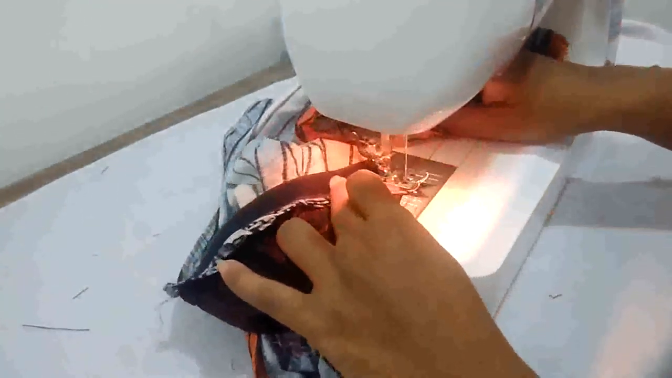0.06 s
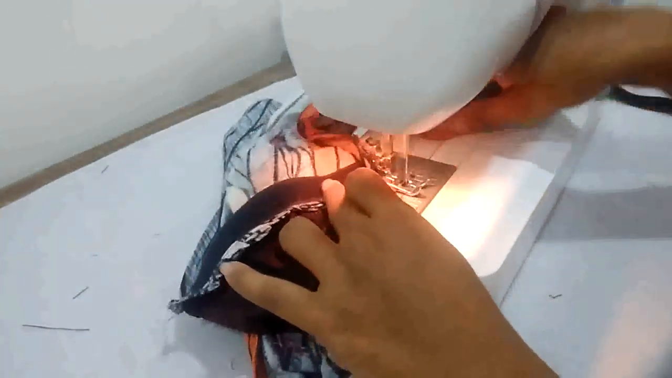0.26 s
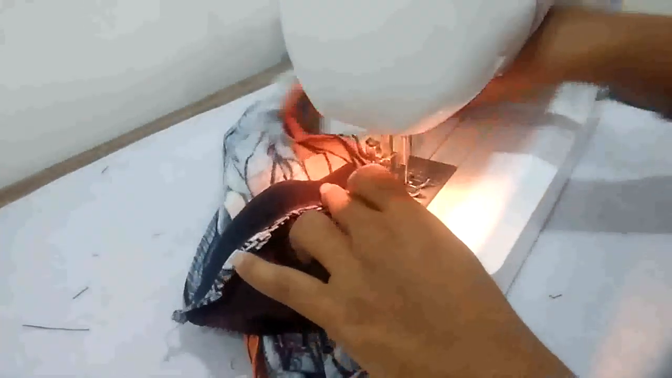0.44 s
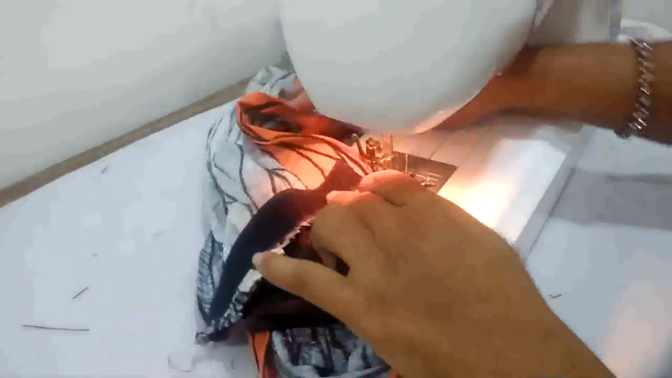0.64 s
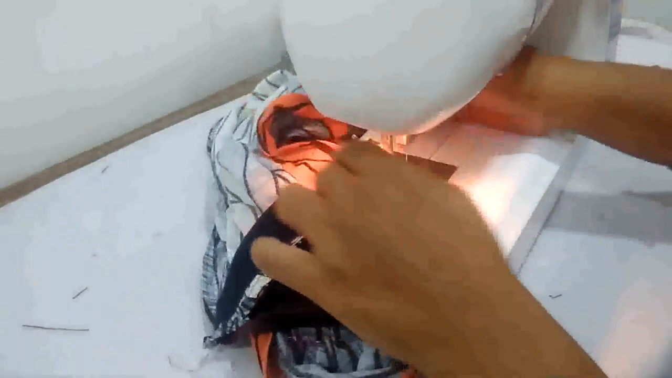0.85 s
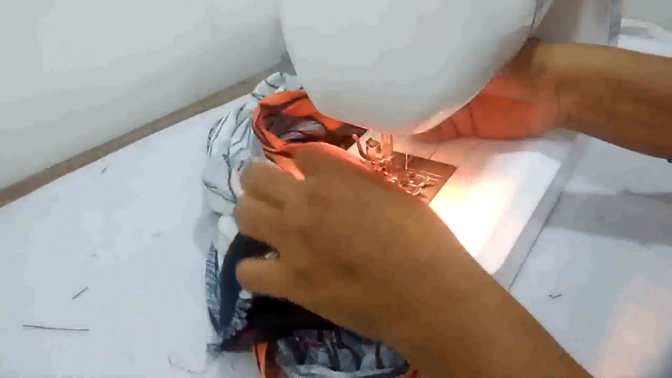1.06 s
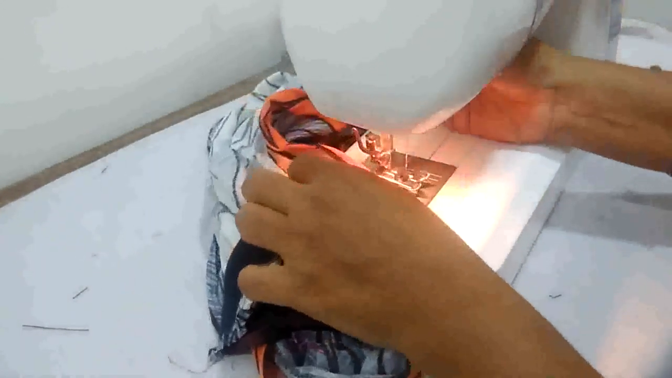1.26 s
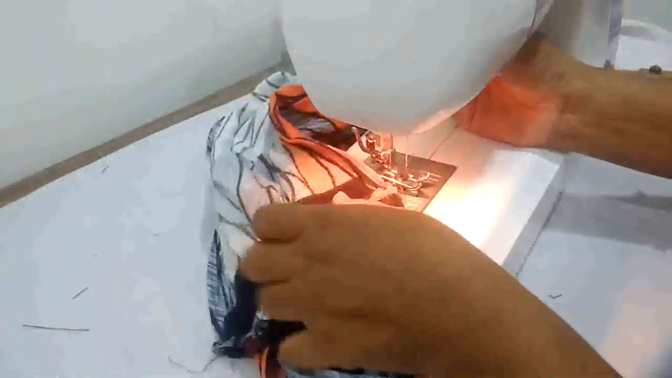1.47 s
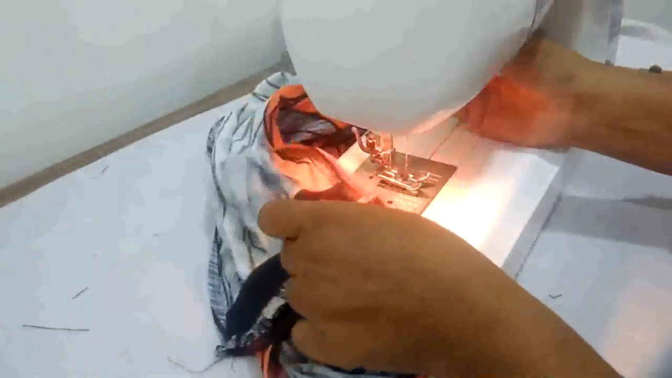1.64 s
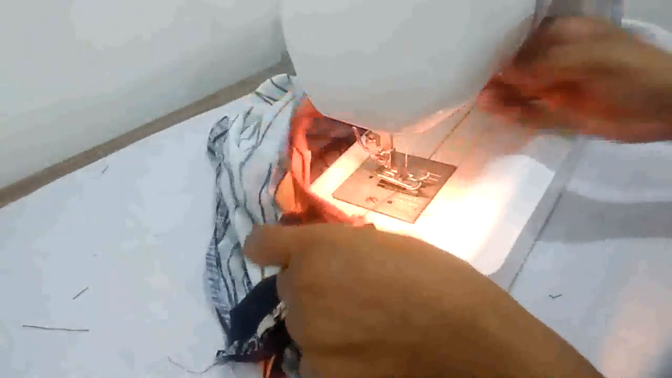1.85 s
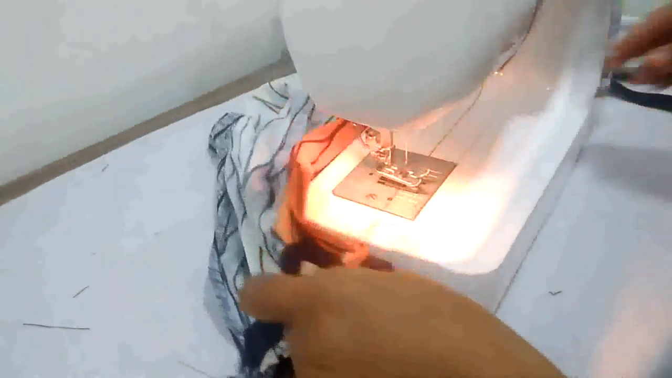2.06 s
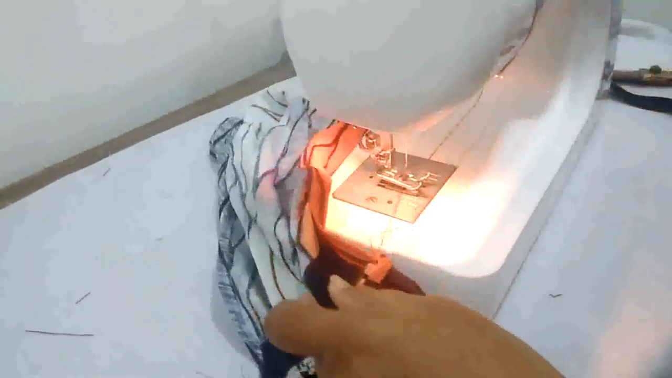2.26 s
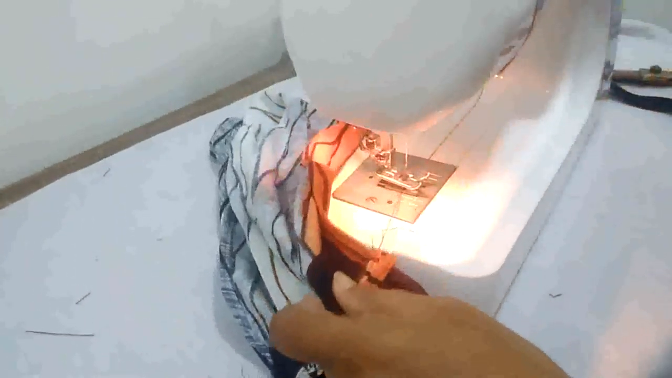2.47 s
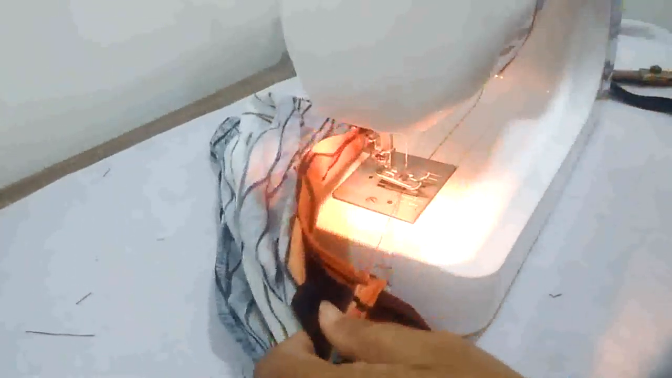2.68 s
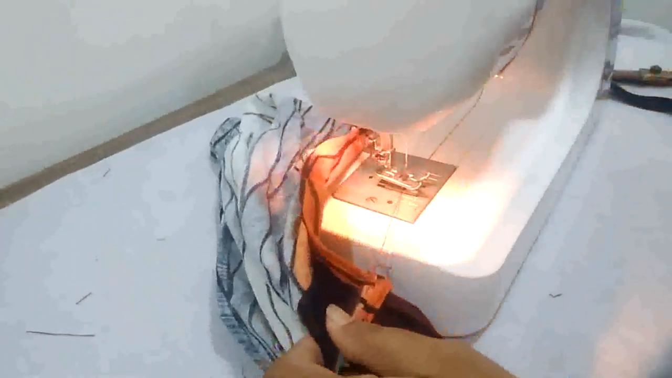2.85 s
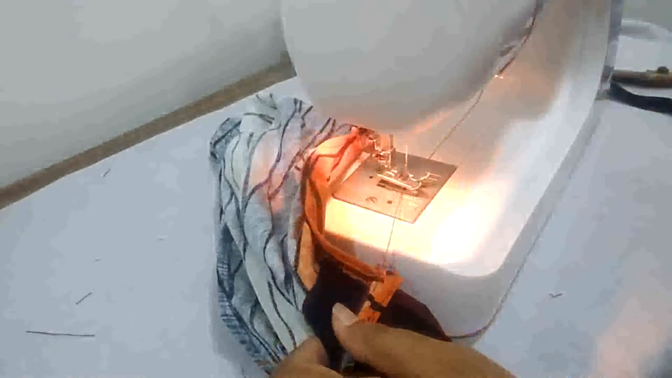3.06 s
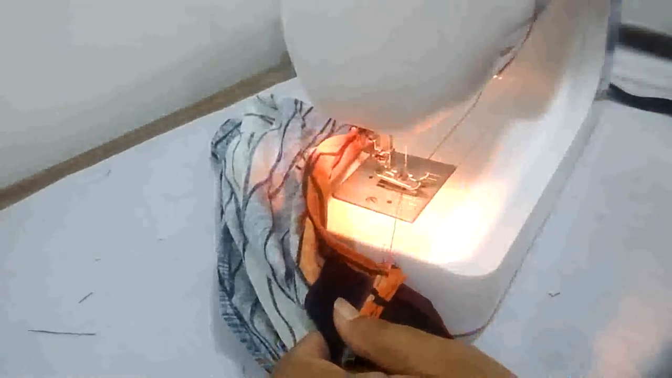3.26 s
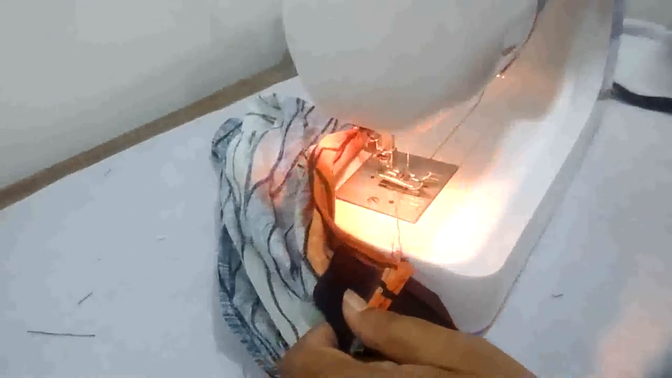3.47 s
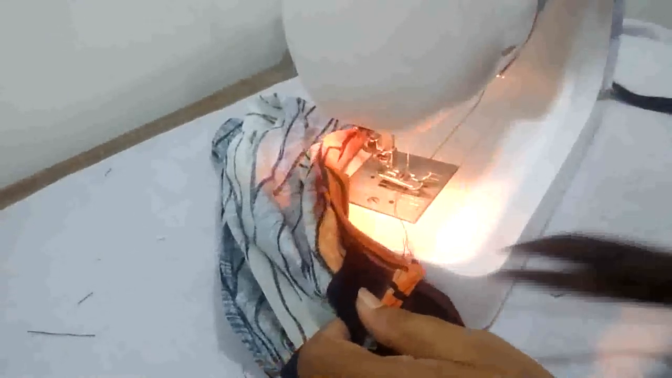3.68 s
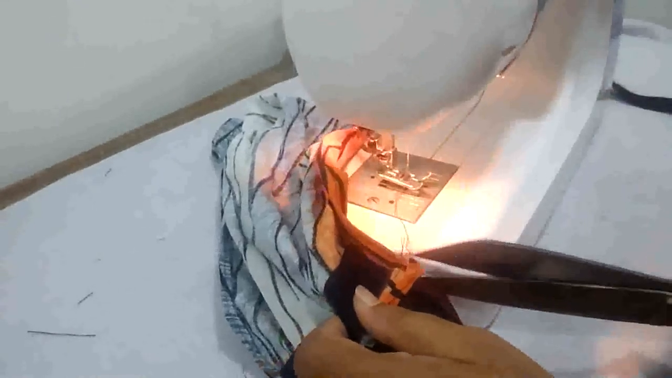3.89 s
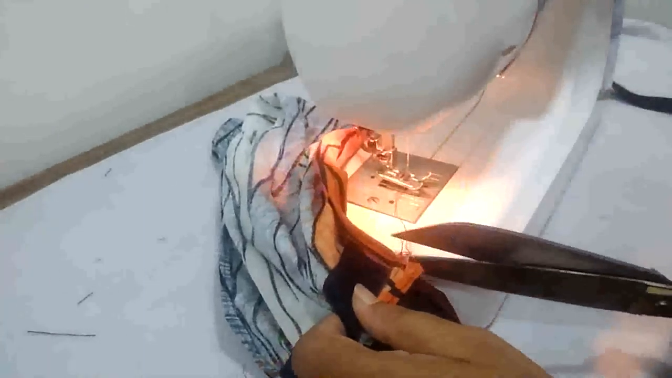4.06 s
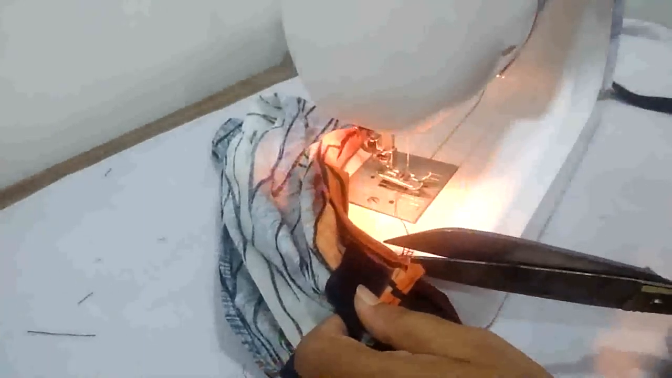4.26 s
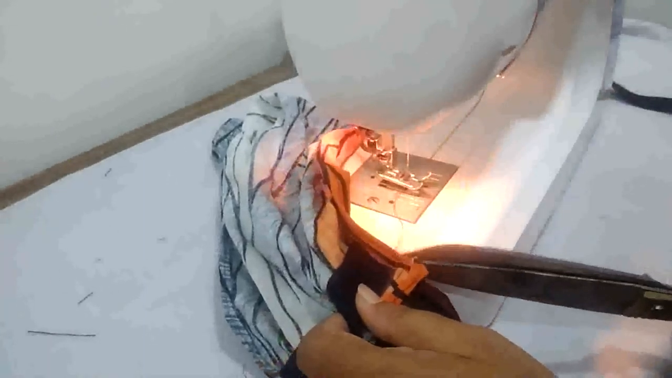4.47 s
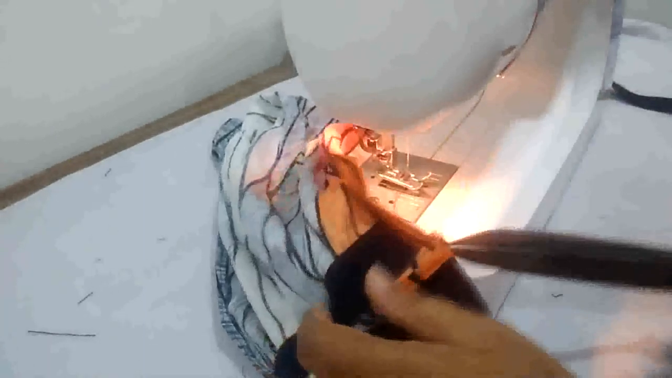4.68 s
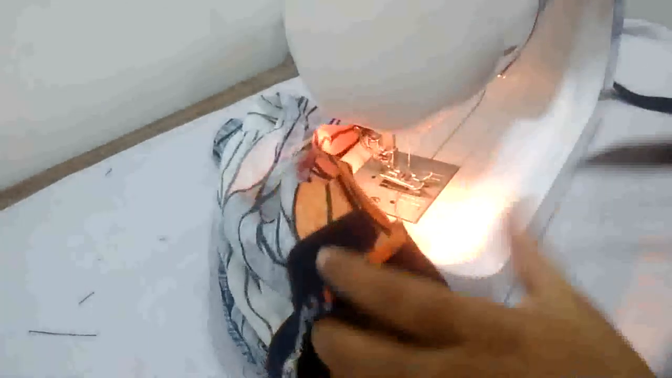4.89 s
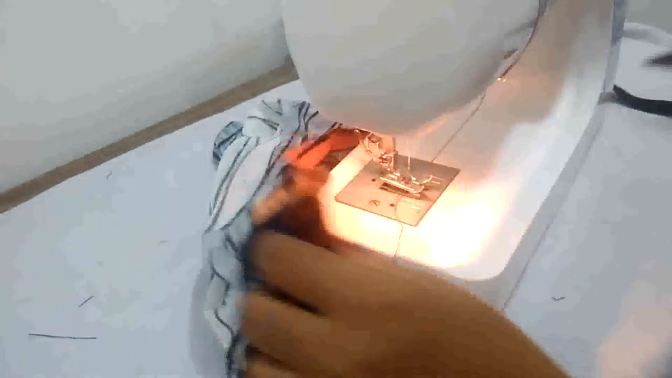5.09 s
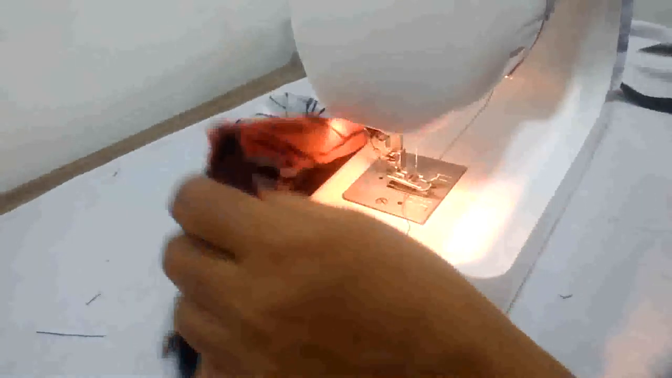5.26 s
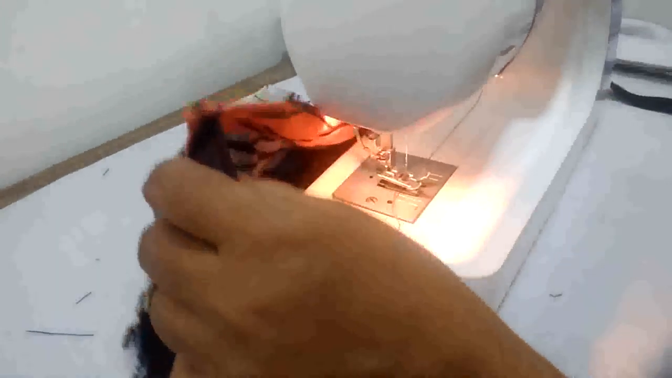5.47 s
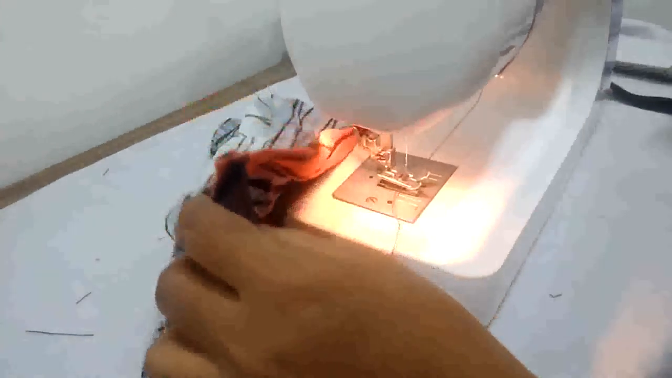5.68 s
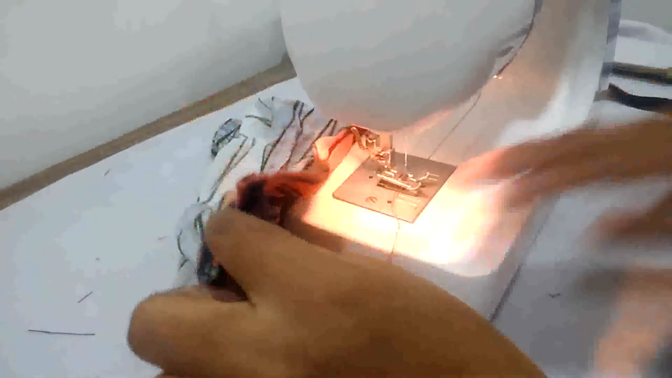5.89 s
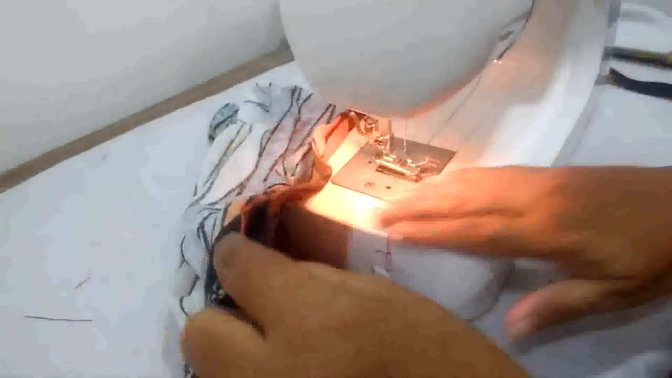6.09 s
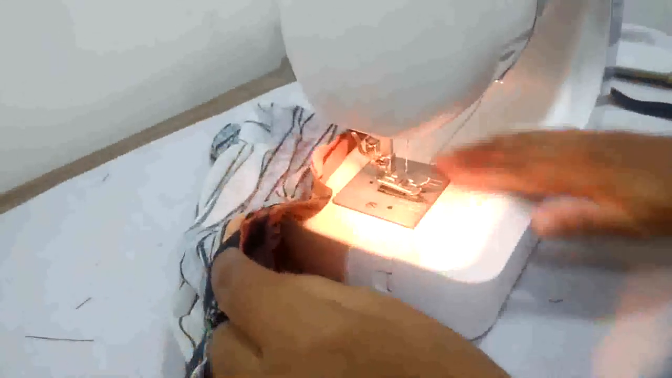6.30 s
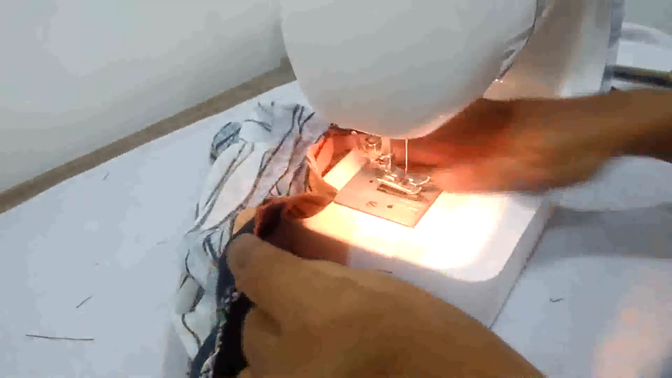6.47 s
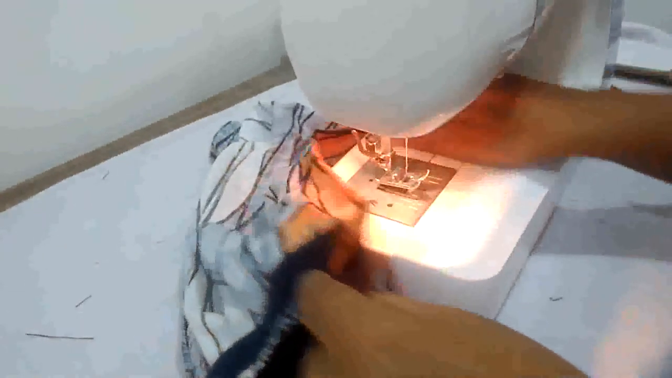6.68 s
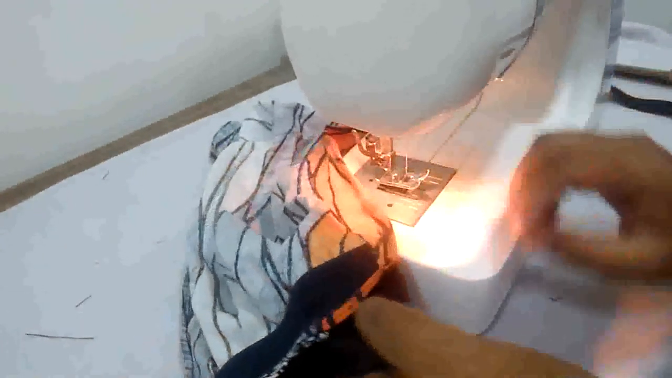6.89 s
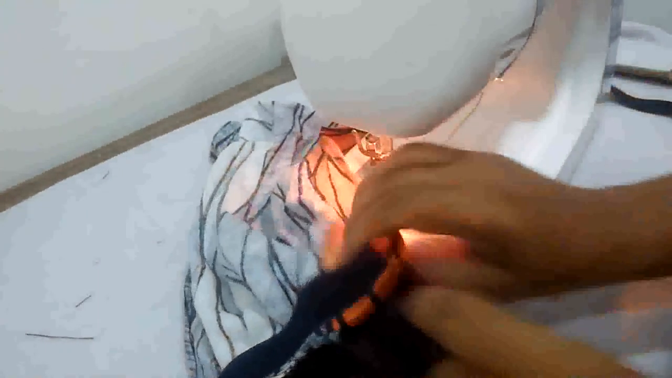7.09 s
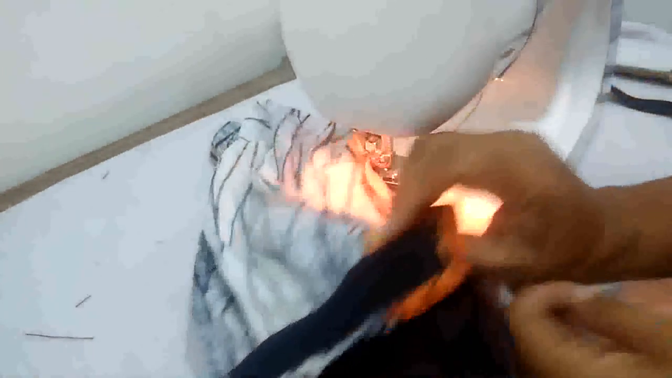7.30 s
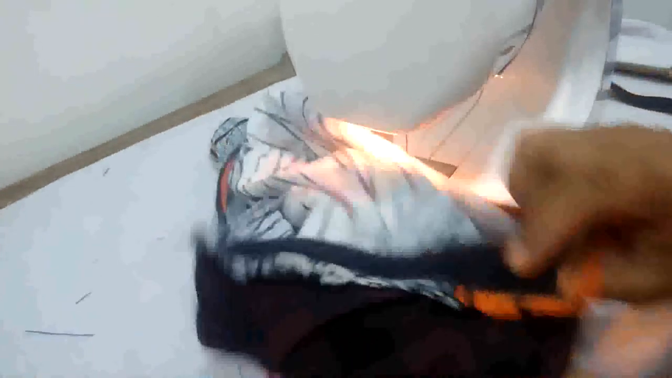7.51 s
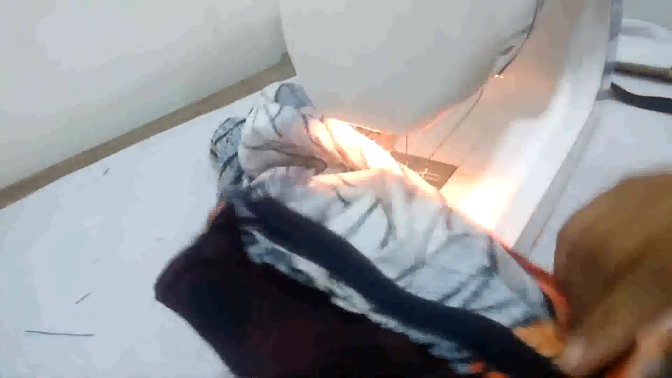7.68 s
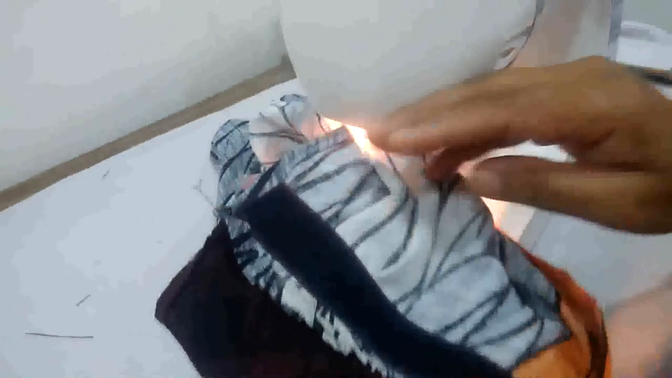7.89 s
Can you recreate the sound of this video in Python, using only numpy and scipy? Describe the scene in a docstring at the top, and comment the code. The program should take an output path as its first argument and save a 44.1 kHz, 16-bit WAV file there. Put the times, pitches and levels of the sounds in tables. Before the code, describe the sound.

A sewing machine's rapid metallic chugging with low table hum runs down and ceases. In the quiet room, close to the microphone, a lever clacks, cloth slides and hands bump the table faintly. Steel shears clink brightly, their blades squeak open and snap shut once. They are dropped on the table with a hard thud, bouncing clang and short ring. Fabric rustles, small clacks and a bright click end it over faint outside rumble.

```python
"""In a small room, heard from close by, an electric sewing machine on a table ends a seam and coasts to a stop.
The presser foot is lifted, the cloth drawn out, and steel shears are picked up, opened and snapped shut.
The shears are put down with a thump and a ring, then the cloth is turned over.
Contacts are short noise bursts coloured by what is struck, ringing is a sum of dying modes,
and gears, friction and room noise are filtered random noise."""
import sys
import numpy as np
from scipy import signal
from scipy.io import wavfile

SR = 44100
rng = np.random.default_rng(int(sys.argv[2]) if len(sys.argv) > 2 else 0)


def file_out(sig):
    """Save sig as 16-bit WAV at sys.argv[1]."""
    # one column per channel
    cols = np.atleast_2d(sig).T
    # limit, then scale
    lim = np.clip(cols, -1, 1)
    pcm = np.round(lim * 32767).astype(np.int16)
    wavfile.write(sys.argv[1], SR, pcm)


N = 350300
TIME = np.arange(N) / SR  # s, the whole scene
RING = np.arange(SR * 3 // 4) / SR  # s, the span of one contact
BINS = np.fft.rfftfreq(8192, 1 / SR)  # Hz, where filter gains are given

# Needle bar, hook and feed knock at the same places in every turn. Each row: share of the turn,
# relative level in dB, tilt in dB per octave, share of the stitch's force that it follows.
KNOCK_PLACES = [(0.16, -41, -3, 1.5), (0.385, -31.5, 4, 0.91), (0.497, -27, 2, 1.3), (0.54, -33, -1.5, 0.2),
                (0.695, -25, 0.8, 0.62), (0.888, -27.5, -0.5, 1.5), (1, -23, 1.9, 1.4)]
# The needle punches dully through a thick fold. Each row: start in seconds, relative level in dB.
FOLD_PUNCHES = [(0.007, -25), (0.186, -33), (0.467, -32), (0.6, -27), (0.773, -28), (0.9216, -36),
                (0.967, -35.5), (.995, -34)]
# Spectrum of a knock. Each row: frequency in Hz, relative level in dB.
KNOCK_SPECTRUM = [(25, -11), (100, -1.5), (300, -5), (800, 3.5), (1500, -2.5), (2800, -2.5), (4200, 0),
                  (6500, -1.5), (8000, -7.5), (10500, -17), (14500, -29.5)]
# Spectrum of the running gears. Each row: frequency in Hz, relative level in dB.
WHIRR_SPECTRUM = [(25, -16.5), (90, -5), (200, -3.5), (330, -5.5), (800, -6), (1300, -8), (2800, -14),
                  (4500, -20), (6800, -17), (8000, -20.5), (11000, -29.5), (14500, -38)]


def machine(knock_db=-7, knock_rise=0.0032, knock_decay=0.006, uneven_db=0.4,
            punch_db=-6, punch_decay=0.008, punch_tilt=-4.0,
            whirr_db=-3.3, linkage_db=-52, rattle_db=-5.5):
    """Periodic impact excitation: metal knocks recur each turn and, with the gears, excite a resonant shell."""
    shell = housing()
    hits = []
    for end, force_db, slowing, length in turns():
        for share, db, hardness, follow in KNOCK_PLACES:
            hit_db = knock_db + db + follow * force_db + uneven_db * rng.standard_normal()
            hits.append((moment(share, end, length, slowing), hit_db, knock_decay, hardness))
    punches = [(s, db + punch_db, punch_decay, punch_tilt) for s, db in FOLD_PUNCHES]
    out = np.zeros(N)
    for s, db, decay, hardness in hits + punches:
        if s > 0:
            spot = ripple(depth_db=2.8, spacing_hz=400)
            shape_db = read(KNOCK_SPECTRUM) + shell + tilt(hardness) + spot
            add(out, s, blow(db, knock_rise, decay, shape_db))
    gears = unit(colour(grains(spread_db=2.0, per_s=700), read(WHIRR_SPECTRUM) + shell))
    running = drive() * (amp(whirr_db) * gears + amp(rattle_db) * rattle())
    return out + running + amp(linkage_db) * coasting() * linkage_ring()


# One row per turn of the shaft. Each row: end in seconds, force in dB, share by which it slows in the turn.
STITCH_TURNS = [(0.0515, 1, 0.0024), (0.1977, 1, 0.0029), (0.342, 0.5, 0.006), (0.483, 0.5, 0.00075),
                (0.63, -1.5, 0.022), (0.7882, -3, 0.076), (0.993, -6.5, 0.18)]


def turns():
    """Period of rotation: each turn lasts the time since the one before (end s, dB, slowing, length s)."""
    lengths = np.diff([row[0] for row in STITCH_TURNS])
    return [(*row, length) for row, length in zip(STITCH_TURNS, np.r_[lengths[0], lengths])]


def moment(share, end, length, slowing):
    """Decelerated rotation: a slowing shaft gets through the first part of its turn sooner."""
    return end - length * (1 - share) * (1 + slowing * share)


# Motor, belt and gears: level at zero force in dB, share of the stitch's force that they follow,
# swell in each turn in dB, fade after the last stitch in dB per second.
DRIVE_DB, DRIVE_FOLLOW, DRIVE_SWELL_DB, COAST_DB_PER_S = -45, 0.74, 0.8, 133


def drive():
    """Amplitude modulation by rotation: the gain follows the force, swells once a turn and coasts down."""
    ends, force_db = np.transpose(STITCH_TURNS)[:2]
    turn = np.interp(TIME, ends, np.arange(len(ends)))
    followed_db = DRIVE_FOLLOW * np.interp(TIME, ends, force_db)
    swell_db = DRIVE_SWELL_DB * np.cos(2 * np.pi * turn)
    return amp(DRIVE_DB + followed_db + swell_db) * coasting()


def coasting():
    """Exponential run-down: the gain dies away after the last stitch."""
    return amp(-COAST_DB_PER_S * np.clip(TIME - STITCH_TURNS[-1][0], 0, 1))


# Resonances of the machine's shell. Each row: frequency in Hz, width in Hz, height in dB.
SHELL_MODES = [(323, 40, 1), (419.7, 70, 6), (536, 60, 1), (626, 70, 6.5), (788, 81, 1.5), (1013, 73, -2),
               (1638, 68, 7), (1847, 72, -0.5), (2155, 170, 4.5), (3750, 220, 3), (6610, 630, 7)]


def housing():
    """Resonant transmission: the shell's bell-shaped peaks add up, in dB."""
    return sum(db / (1 + (2 * (BINS - hz) / width) ** 2) for hz, width, db in SHELL_MODES)


def linkage_ring(count=6, sway=0.0348, fall_db=6.5):
    """Random forcing of resonances: the linkage keeps the lower shell modes swelling and wandering singly."""
    out = np.zeros(N)
    for hz, width, db in SHELL_MODES[:count]:
        cycles = np.cumsum(hz * (1 + sway * drift(N, per_s=25))) / SR
        out += amp(db - fall_db * np.log2(hz)) * drift(N, per_s=width) * np.sin(2 * np.pi * cycles)
    return unit(out)


def rattle(count=20, per_s=11, spread_db=1.5):
    """Random impact trains: loose small parts ping between the knocks, each with its own ring."""
    shell_db = read(KNOCK_SPECTRUM) + housing()
    parts = [shell_db + ripple(depth_db=6, spacing_hz=300) for _ in range(count)]
    return unit(sum(unit(colour(crackle(per_s, spread_db), shape_db)) for shape_db in parts))


# The needle bar rocks the table once a stitch. Each row: start in seconds, relative level in dB,
# rise in seconds.
TABLE_ROCKS = [(0, -32, 0.013), (0.132, -39, 0.059), (0.277, -39.5, 0.043), (0.411, -40.5, 0.05),
               (0.568, -39.5, 0.04), (0.702, -36.5, 0.041), (0.915, -37.5, 0.047), (1.072, -56, .03)]
# Sway of the table: pitch in Hz, size of its wavering as a share, decay time constant in seconds.
ROCK_HZ, ROCK_WAVER, ROCK_DECAY_S = 120.5, 0.036, 0.061


def rocking(rock_db=-1.0, uneven=0.15, upper_hz=200, upper_db=-15):
    """Forced vibration: the needle bar shakes two table modes, whose hum swells, wavers and dies."""
    out = np.zeros(N)
    for s, db, rise in TABLE_ROCKS:
        onset = np.sin(np.pi / 2 * np.minimum(RING / rise, 1))
        swell = onset * np.exp(-np.maximum(RING - rise, 0) / ROCK_DECAY_S)
        for hz, mode_db in [(ROCK_HZ, 0), (upper_hz, upper_db)]:
            cycles = np.cumsum(hz * (1 + ROCK_WAVER * drift(len(RING), per_s=48))) / SR
            strength = swell * (1 + uneven * drift(len(RING), per_s=95))
            add(out, s, amp(db + rock_db + mode_db) * strength * np.sin(2 * np.pi * cycles))
    return out


# Short hard clacks of machine levers and of the shears being picked up. Each row: start in seconds,
# level in dB, rise in seconds, decay in seconds, tilt in dB per octave, added ring in dB relative to the clack.
HARD_CLACKS = [(1.055, -48.5, 0.0018, 0.0042, 4, -24.5), (1.2338, -51, 0.0012, 0.0082, 1.5, -15),
               (1.475, -64.5, 0.0088, 0.029, 2.5, -22), (1.835, -44.5, 0.0054, 0.006, 1.5, -6),
               (1.845, -45.5, 0.0032, 0.0054, -5, -2.5), (2.833, -61.5, 0.0097, 0.019, 1, -28.5),
               (3.1222, -49, 0.0018, 0.013, 9, -26), (6.461, -58.5, 0.0014, 0.016, 2, -25),
               (6.631, -46, 0.0032, 0.0066, 0.5, -32), (6.938, -48.5, 0.0012, 0.005, -3, -29)]
# Spectrum of a clack. Each row: frequency in Hz, relative level in dB.
CLACK_SPECTRUM = [(100, -22), (400, -10.5), (650, 2.5), (1000, -4), (1500, 1), (2500, -2), (5000, -0.5),
                  (7000, 0), (9000, -11.5), (14500, -23)]
# Presser bar and its spring. Each row: frequency in Hz, relative level in dB, t60 in seconds.
PRESSER_MODES = [(640, 2.5, 0.11), (963, -2, 0.07), (1220, -2, 0.1), (1630, 0, 0.094)]


def clacks():
    """Impact with modal response: machine levers, and the shears as they are picked up, clack and ring briefly."""
    out = np.zeros(N)
    for s, db, rise, decay, hardness, ring_db in HARD_CLACKS:
        clack = blow(db, rise, decay, read(CLACK_SPECTRUM) + housing() + tilt(hardness))
        add(out, s, clack + amp(db + ring_db) * ring(PRESSER_MODES, rise))
    return out


# Light clinks and scrapes of steel, from the shears and from machine parts. Each row: start in seconds,
# level in dB, decay in seconds, tilt in dB per octave.
STEEL_TOUCHES = [(1.829, -58, 0.016, 2), (2.339, -50, 0.0024, 6), (2.382, -49.5, 0.002, 12),
                 (2.527, -54.5, 0.012, 9), (2.604, -56, 0.032, -3), (3.064, -59, 0.018, 4),
                 (3.1207, -41.5, 0.015, 1), (3.475, -31.5, 0.0095, 1.5), (3.94, -57.5, 0.0025, 6),
                 (4.243, -57.5, 0.0043, 4), (4.4205, -56, 0.0015, 7), (6.632, -47, 0.0038, -5),
                 (7.379, -61, 0.019, 6)]
TOUCH_RISE = 0.14  # a touch builds up over this share of its decay time
# One blade slides on the other and squeaks. Each row: start in seconds, level in dB, length in seconds,
# start pitch in Hz, end pitch in Hz, scraping noise in dB relative to the squeak's peak.
BLADE_SLIDES = [(3.591, -48, 0.023, 7800, 7100, -5), (3.594, -62, .014, 5700, 5300, -9),
                (3.594, -56, 0.012, 10100, 11000, 3), (4.553, -68, 0.019, 8100, 7700, -1),
                (4.578, -57, 0.052, 7700, 7100, 2)]
# Spectrum of steel contacts. Each row: frequency in Hz, relative level in dB.
STEEL_SPECTRUM = [(200, -32), (1500, -31.5), (3500, -21.5), (5000, -6.5), (6200, 6.5), (7300, 4.5),
                  (8500, -1), (11000, -11), (14500, -21)]


def steel_contacts(ring_db=-31, full_ring_s=0.007, waver=0.025):
    """Impact and friction: shears and machine parts clink and scrape lightly; sliding blades squeak and glide."""
    out = np.zeros(N)
    for s, db, decay, hardness in STEEL_TOUCHES:
        rise = TOUCH_RISE * decay
        ringing = amp(db + ring_db) * min(decay / full_ring_s, 1) ** 0.5  # brief touches ring less
        shape_db = read(STEEL_SPECTRUM) + tilt(hardness) + ripple(depth_db=2, spacing_hz=450)
        add(out, s, blow(db, rise, decay, shape_db) + ringing * blade_ring(rise))
    for s, db, length, start_hz, end_hz, scrape_db in BLADE_SLIDES:
        count = int(length * SR)
        hz = np.linspace(start_hz, end_hz, count) * (1 + waver * drift(count, per_s=2000))
        squeak = np.sin(2 * np.pi * np.cumsum(hz) / SR)
        noise = unit(colour(rng.standard_normal(count), read(STEEL_SPECTRUM) + tilt(7.7)))
        window = signal.windows.tukey(count, 0.5)
        add(out, s, amp(db) * window * (squeak + amp(scrape_db) * noise))
    return out


# Ringing steel, as of the open shears. Each row: frequency in Hz, relative level in dB.
SHEARS_MODES = [(4740, -10), (5524, -3), (5640, -3), (6170, -5.5), (6277, -1), (6440, -5), (6745, -0.5),
                (7200, -10), (7384, -1), (7815, -6), (8200, -10.5), (10880, -16.5)]


def blade_ring(rise, t60=0.27):
    """Free vibration: steel rings like open blades, with one common decay time."""
    return ring([(hz, db, t60) for hz, db in SHEARS_MODES], rise)


# The blades snap shut and rebound. Each row: start in seconds, relative level in dB.
BLADE_SNAPS = [(4.6313, -11), (4.6331, -13.5), (4.635, -22.5)]
# The closed blades damp each other within a few ms. Each row: frequency in Hz, relative level in dB.
SNIP_MODES = [(5730, -10.5), (6270, -5), (6780, -2.5), (8000, -13), (9200, -20), (10350, -16.5),
              (11940, -26)]


def snip(contact=0.0001, t60=0.0062, low_cut_hz=4600, chatter_db=-41, chatter_decay=0.012):
    """Damped modes, weak bass radiation: narrow blades snap shut, rebound twice and chatter briefly."""
    out = np.zeros(N)
    modes = [(hz, mode_db, t60) for hz, mode_db in SNIP_MODES]
    for s, db in BLADE_SNAPS:
        add(out, s, amp(db) * ring(modes, contact))
    chatter = blow(chatter_db, 0.002, chatter_decay, read(STEEL_SPECTRUM) + tilt(1.5))
    add(out, BLADE_SNAPS[0][0], chatter)
    return signal.sosfilt(signal.butter(3, low_cut_hz, "high", fs=SR, output="sos"), out)


# Spectrum of the click at the snap. Each row: frequency in Hz, relative level in dB.
CLICK_SPECTRUM = [(600, -26), (1400, -11), (2900, -3), (7000, 1), (14500, -5)]


def snap_click(s=4.6319, db=-30, decay=0.0012):
    """Broadband impulse: a dry click as the blades snap shut."""
    out = np.zeros(N)
    add(out, s, blow(db, 0.0001, decay, read(CLICK_SPECTRUM)))
    return out


def steel_catch(s=6.9392, db=-32.5, decay=0.002, low_cut_hz=5400):
    """Impulsive contact: a small steel catch on the machine gives one dry, bright click."""
    out = np.zeros(N)
    add(out, s, blow(db, 0, decay, read(STEEL_SPECTRUM)))
    return signal.sosfilt(signal.butter(6, low_cut_hz, "high", fs=SR, output="sos"), out)


# The shears land on the table and bounce. Each row: start in seconds, level in dB.
SHEARS_LANDINGS = [(5.6862, -28), (5.689, -25), (5.6935, -25.5), (5.703, -30), (5.71, -33), (5.735, -42)]
# Spectrum of the landing shears. Each row: frequency in Hz, relative level in dB.
CLATTER_SPECTRUM = [(290, -28), (500, -10), (854, -14.5), (1290, -24), (1600, -12.5), (2100, -24.5),
                    (4080, -12), (5260, -8.5), (6870, 3.5), (8730, -15), (10600, -12.5), (14500, -25)]


def shears_laid_down(rise=0.0025, decay=0.006, ring_db=-22):
    """Successive impacts: blades and handles land in turn, each with its own clang, then chatter and ring out."""
    out = np.zeros(N)
    for s, db in SHEARS_LANDINGS:
        clang = blow(db, rise, decay, read(CLATTER_SPECTRUM) + ripple(depth_db=1.5, spacing_hz=348))
        add(out, s, clang + amp(db + ring_db) * blade_ring(rise))
    return out


# Hands and shears bump the table. Each row: start in seconds, relative level in dB, contact in seconds,
# strongest frequency in Hz.
TABLE_BUMPS = [(1.236, -55, 0.0016, 252), (2.498, -52.5, 0.0078, 213), (2.61, -50.5, 0.014, 109),
               (2.636, -50, 0.0096, 115), (2.68, -48, 0.004, 346), (2.812, -53, 0.0098, 111),
               (3.123, -52, 0.0064, 125), (3.178, -58.5, 0.0052, 192), (3.205, -52.5, 0.0065, 164),
               (3.353, -55, 0.0062, 148), (5.4855, -37, 0.0013, 385), (5.495, -47.5, 0.0043, 110),
               (5.573, -42.5, 0.0082, 60), (5.652, -49, 0.0066, 116), (5.684, -33.5, 0.0024, 226),
               (6.795, -60, 0.0088, 65), (6.938, -52.5, .0025, 484)]
# Modes of the table top. Each row: frequency in Hz, relative level in dB, t60 in seconds.
TABLE_MODES = [(60.3, -9, .45), (124.5, -3.5, 0.42), (160.5, -5.5, 0.62), (196, -1.5, 0.28),
               (293.5, -2.5, 0.28), (319.1, 0, 0.27), (408, -10, 0.3), (538, -17, 0.38), (578, -15, 0.42)]
# Spectrum of a bump's dull thud. Each row: frequency in Hz, relative level in dB.
THUD_SPECTRUM = [(40, -7.5), (100, -1), (330, 0), (600, -8.5), (1000, -20), (1600, -27.5), (6000, -56)]
# Spectrum of a short contact on the table top. Each row: frequency in Hz, relative level in dB.
TAP_SPECTRUM = [(200, -9.5), (600, 5.5), (1100, -2.5), (2500, -41), (7000, -28), (14000, -58)]


def table(focus_db=7, thud_db=-8.5, thud_decay=0.045, tap_db=-1, soft_db_per_s=3500):
    """Modal excitation: where a bump lands decides which modes of the table top answer most."""
    out = np.zeros(N)
    for s, db, contact, centre_hz in TABLE_BUMPS:
        modes = [(hz, mode_db - focus_db * np.log2(hz / centre_hz) ** 2, t60)
                 for hz, mode_db, t60 in TABLE_MODES]
        thud_shape_db = read(THUD_SPECTRUM) + tilt(2.9 * np.log2(centre_hz / 300))
        thud = blow(thud_db, contact, thud_decay, thud_shape_db)
        # the longer the contact, the weaker its tap
        tap = blow(tap_db - soft_db_per_s * contact, 0.00048, 0.0057, read(TAP_SPECTRUM))
        add(out, s, amp(db) * (ring(modes, contact, scatter=0) + thud + tap))
    return out


# The hands push the cloth over the bed. Each row: time of the fastest motion in seconds, relative level
# in dB, length in seconds, tilt in dB per octave.
CLOTH_STROKES = [(1.54, -71.5, 0.14, -0.5), (2.63, -68.5, 0.21, -1.5), (2.953, -72, 0.42, -2.5),
                 (6.515, -64.5, 0.32, 2), (6.68, -68, 0.11, 0), (7.436, -73, 0.15, 2.5),
                 (7.709, -71.5, 0.14, 0.5)]
# A stroke swells and dies over these shares of its length; held cloth keeps whispering.
STROKE_RISE, STROKE_FALL, HELD_DB = 0.53, 1, -79.5
# Spectrum of the fabric. Each row: frequency in Hz, relative level in dB.
CLOTH_SPECTRUM = [(200, 1.5), (700, 2.5), (1500, 0.5), (2600, -5.5), (5000, -6.5), (7000, 7.5),
                  (8500, -3.5), (11000, -8), (14500, -9)]


def cloth(cloth_db=0, snag_db=-7):
    """Stick-slip friction: threads catch and slip on the bed; a stroke swells quickly and dies more slowly."""
    friction = grains(spread_db=2.5, per_s=760) * amp(1.6 * drift(N, per_s=53))
    slips = unit(colour(friction, read(CLOTH_SPECTRUM)))
    snags = unit(colour(crackle(per_s=300, spread_db=2.0), read(CLOTH_SPECTRUM)))
    rustle = slips + amp(snag_db) * snags
    out = amp(HELD_DB) * slips
    for s, db, length, hardness in CLOTH_STROKES:
        away = (TIME - s) / (length * np.where(TIME < s, STROKE_RISE, STROKE_FALL))
        stretch = np.roll(rustle, rng.integers(N))  # each stroke takes another stretch of rustle
        out = out + amp(db + cloth_db) * np.exp(-away ** 2) * unit(colour(stretch, tilt(hardness)))
    return out


# Hand and cloth rub dully over the hollow machine bed. Each row: middle in seconds, level in dB,
# length in seconds, middle pitch in Hz, glide in octaves per second.
BED_RUBS = [(2.573, -61, 0.11, 305, -1), (2.7, -68.5, 0.15, 650, -1.5), (2.889, -67, 0.098, 459, 4),
            (3.849, -66, 0.077, 501, -0.5), (4.18, -67.5, 0.14, 593, 0.5), (4.55, -66, 0.35, 651, 0),
            (6.454, -61.5, 0.11, 543.6, 5), (6.549, -63.5, 0.13, 639, 1), (6.815, -63, 0.089, 674, -1)]


def rubs(width_hz=150, catch_db=3.5):
    """Friction in a gliding resonance: noise fills one hollow band as the hand moves and the skin slips."""
    out = np.zeros(N)
    for s, db, length, hz, glide in BED_RUBS:
        count = int(length * SR)
        octaves = glide * np.linspace(-length / 2, length / 2, count)
        cycles = np.cumsum(hz * 2 ** octaves) / SR
        noise = drift(count, 2 * width_hz) + 1j * drift(count, 2 * width_hz)
        friction = noise * amp(catch_db * drift(count, per_s=60.3))
        tone = unit((friction * np.exp(2j * np.pi * cycles)).real)
        add(out, s - length / 2, amp(db) * tone * np.hanning(count))
    return out


# Spectrum of the room noise. Each row: frequency in Hz, relative level in dB.
FLOOR_SPECTRUM = [(25, 5), (71, 2.5), (228, -6), (340, -7.5), (468, -15), (579, -15), (1100, -20),
                  (1550, -14.5), (1870, -25), (4740, -29), (7070, -29.5), (8510, -40.5), (13400, -43.5),
                  (14500, -33.5)]
# Spectrum of the wash from outside. Each row: frequency in Hz, relative level in dB.
OUTSIDE_SPECTRUM = [(100, -22.5), (250, -5.5), (350, 2.5), (650, -1), (900, -5.5), (1500, -12),
                    (3000, -20.5), (6000, -44)]
# Swell of the sound from outside. Each row: time in seconds, relative level in dB.
OUTSIDE_SWELL = [(1.3, -69), (2.1, -71), (4.3, -67), (5.45, -68), (6.5, -70), (7.2, -68.5), (7.7, -67.5)]


def background(floor_db=-71, wash_db=-1, waver_db=2.6, rumble_db=-5, rumble_hz=55):
    """Filtered noise: steady in the room, with a dull wash and lumpy rumble from outside that swell and fade."""
    floor = amp(floor_db) * unit(colour(rng.standard_normal(N), read(FLOOR_SPECTRUM)))
    wash = unit(colour(grains(spread_db=waver_db, per_s=14), read(OUTSIDE_SPECTRUM)))
    octave = rumble_hz * 2 ** np.array([-0.5, 0.5])
    band = signal.butter(2, octave, "band", fs=SR, output="sos")
    rumble = unit(signal.sosfilt(band, grains(spread_db=waver_db, per_s=11)))
    return floor + level(OUTSIDE_SWELL) * (amp(wash_db) * wash + amp(rumble_db) * rumble)


# Reverberation of the room. Each row: frequency in Hz, t60 in seconds.
ROOM_DECAY = [(100, 0.65), (400, 0.54), (1500, 0.45), (4000, 0.37), (7000, 0.36), (14000, 0.4)]


def room(x, build_up=0.0046):
    """Diffuse reverberation: sparse random reflections build up, then each band dies at its own speed."""
    sparse = rng.standard_normal(len(RING)) * (rng.random(len(RING)) < 5000 / SR)
    taps = sparse * (1 - np.exp(-RING / build_up))
    hz, t, z = signal.stft(taps, SR, nperseg=256)
    decay = np.exp(-np.log(1000) * t / read(ROOM_DECAY, hz)[:, None])
    tail = signal.istft(z * decay, SR)[1]
    return signal.fftconvolve(x, tail / np.linalg.norm(tail))[:N]


def amp(db):
    """Decibel law: 20 dB is a factor of ten in amplitude."""
    return 10 ** (np.asarray(db) / 20)


def unit(x):
    """Effective value: scales a sound to a root mean square of one."""
    return x / np.sqrt(np.mean(x ** 2) + 1e-30)


def read(points, hz=BINS):
    """Logarithmic frequency scale: joins the points of a curve by straight lines."""
    f, value = np.transpose(points)
    return np.interp(np.log(hz + 1), np.log(f + 1), value)


def level(curve):
    """Envelope: turns a dB curve into a gain for every sample."""
    return amp(np.interp(TIME, *np.transpose(curve)))


def add(mix, s, sound):
    """Superposition: mixes a sound in at time s."""
    part = mix[max(round(s * SR), 0):][:len(sound)]
    part += sound[:len(part)]


def colour(x, shape_db):
    """Minimum-phase filtering: a causal response with the given gain at each of BINS."""
    log_gain = np.log(amp(np.r_[shape_db, shape_db[-2:0:-1]]))
    taps = np.fft.ifft(np.exp(np.conj(signal.hilbert(log_gain)))).real
    return signal.fftconvolve(x, taps[:len(taps) // 2])[:len(x)]


def tilt(db_per_octave):
    """Contact stiffness: harder blows are brighter, a slope about 2 kHz that is level below 200 Hz."""
    return db_per_octave * np.log2(np.maximum(BINS, 200) / 2000)


def ripple(depth_db, spacing_hz):
    """Point response: each contact point favours its own resonances, in dB."""
    knots = rng.standard_normal(400)
    return depth_db * np.interp(BINS / spacing_hz, np.arange(len(knots)), knots)


def blow(db, rise, decay, shape_db):
    """Impact: a fast-dying spray of tiny impacts, coloured by what it strikes, its energy kept."""
    onset = np.minimum(RING / (rise + 1e-5), 1)
    envelope = onset * np.exp(-np.maximum(RING - rise, 0) / decay)
    sound = colour(envelope * rng.choice([-1., 1.], len(RING)), shape_db)
    return amp(db) * sound * np.linalg.norm(envelope) / np.linalg.norm(sound)


def ring(modes, rise, scatter=1):
    """Modal superposition: dying modes set going over the contact, in step or scattered in phase."""
    sound = np.zeros(len(RING))
    for hz, db, t60 in modes:
        dying = np.exp(-np.log(1000) * RING / t60)
        sound += amp(db) * dying * np.sin(2 * np.pi * (hz * RING + scatter * rng.random()))
    return sound * (1 - np.exp(-RING / rise))


def drift(count, per_s):
    """Random fluctuation: straight lines between chance values of unit spread, per_s of them a second."""
    knots = rng.standard_normal(int(count / SR * per_s) + 3)
    return np.interp(np.arange(count) / SR * per_s, np.arange(len(knots)), knots)


def grains(spread_db, per_s):
    """Modulated noise: many small contacts of uneven strength."""
    return rng.standard_normal(N) * amp(spread_db * drift(N, per_s))


def crackle(per_s, spread_db):
    """Random impulse process: sparse tiny impacts, of chance strength."""
    hits = rng.standard_normal(N) * (rng.random(N) < per_s / SR)
    return hits * amp(spread_db * np.minimum(rng.exponential(1, N), 2))


# Near surfaces. Each row: delay in seconds, gain as a factor.
NEAR_ECHOES = [(.008, 0.062), (0.015, 0.037), (0.03, 0.082)]


def scene(side_db=-3):
    """Direct and reverberant field: near sources are mostly direct; only the room's treble differs by ear."""
    sources = [  # each with its level into the room in dB
        (machine(), -7), (rocking(), -14), (clacks(), -5), (steel_contacts(), -8), (snip(), -12.5),
        (snap_click() + steel_catch(), -15), (shears_laid_down(), -2), (table(), -11),
        (cloth() + rubs(), -5)]
    direct = sum(sound for sound, _ in sources)
    sent = sum(amp(wet_db) * sound for sound, wet_db in sources)
    early = sum(gain * np.interp(TIME - delay, TIME, direct, left=0) for delay, gain in NEAR_ECHOES)
    mid = direct + early + room(sent) + background()
    treble = signal.butter(10, 5300, "high", fs=SR, output="sos")
    side = amp(side_db) * signal.sosfilt(treble, room(sent))
    return np.array([mid + side, mid - side])


EDGE_HZ = 14520  # upper band limit


def record(dry, low_cut_hz=42, ceiling_db=-14.0):
    """Band limiting and saturation: bass roll-off of the microphone, a soft ceiling on peaks, a treble limit."""
    thin = signal.sosfilt(signal.butter(3, low_cut_hz, "high", fs=SR, output="sos"), dry)
    held = thin / (1 + (thin / amp(ceiling_db)) ** 6) ** (1 / 6)
    low_pass = signal.firwin(601, EDGE_HZ, window=("kaiser", 8), fs=SR)
    return signal.oaconvolve(held, low_pass[None], "same")


dry = scene()
out = record(dry)
file_out(out)
```